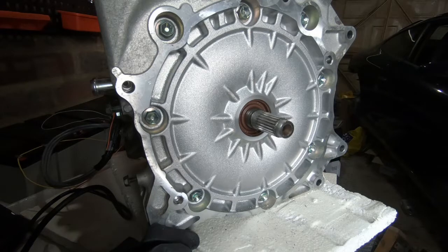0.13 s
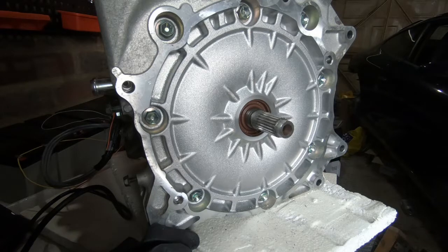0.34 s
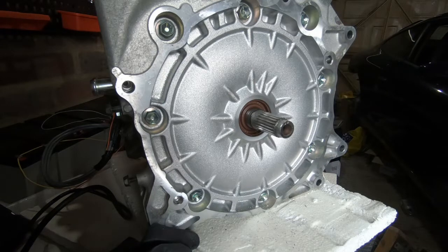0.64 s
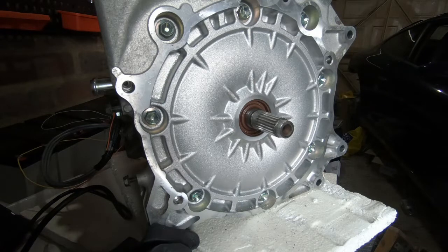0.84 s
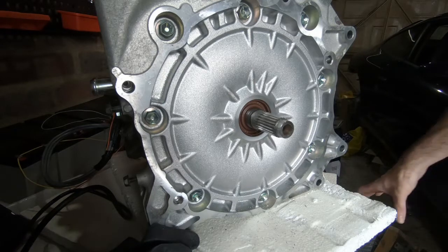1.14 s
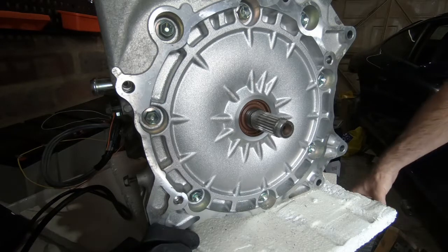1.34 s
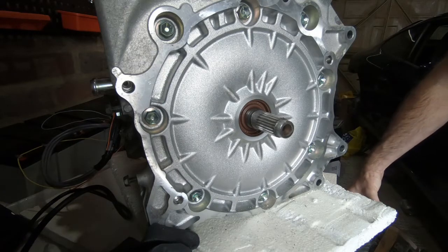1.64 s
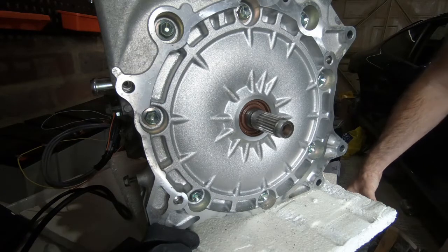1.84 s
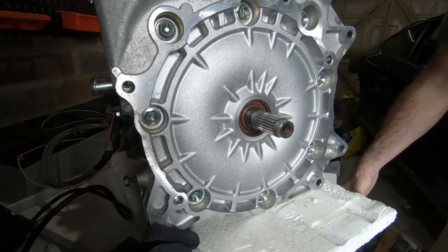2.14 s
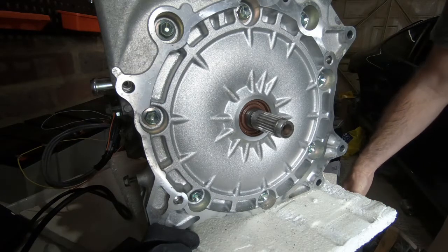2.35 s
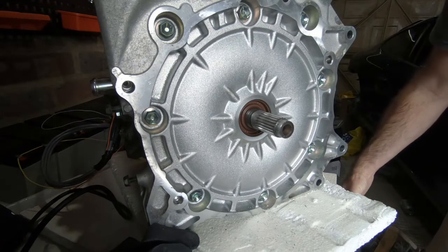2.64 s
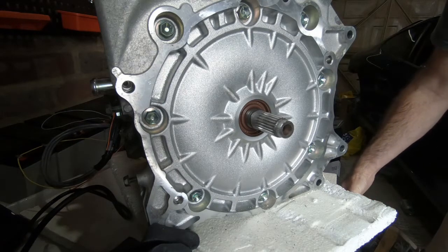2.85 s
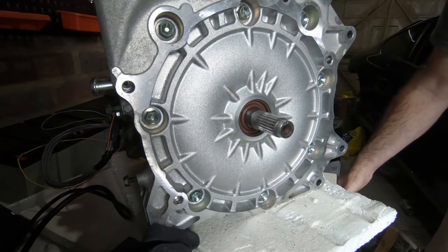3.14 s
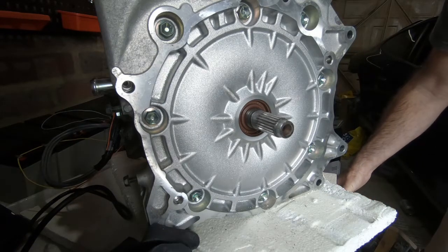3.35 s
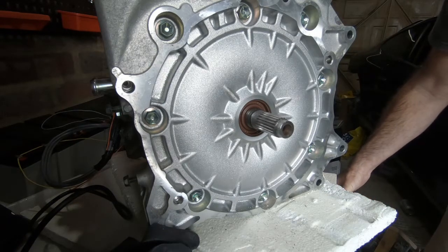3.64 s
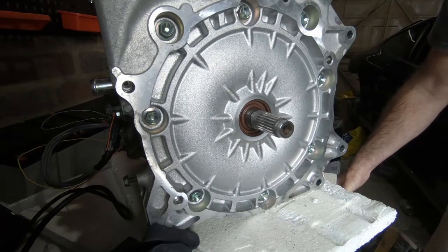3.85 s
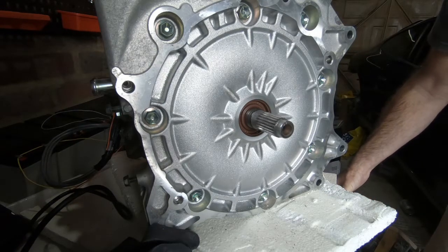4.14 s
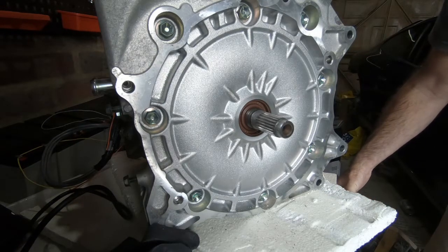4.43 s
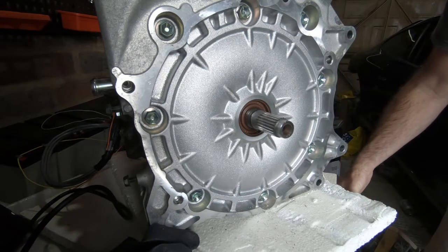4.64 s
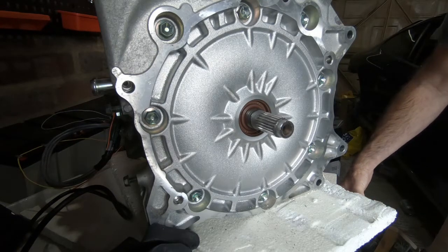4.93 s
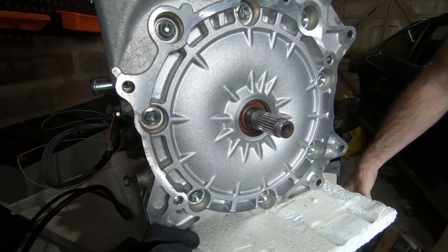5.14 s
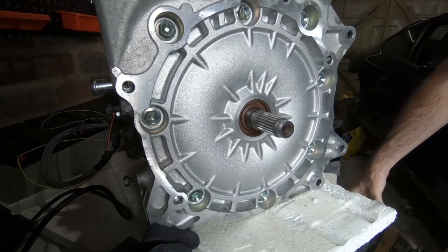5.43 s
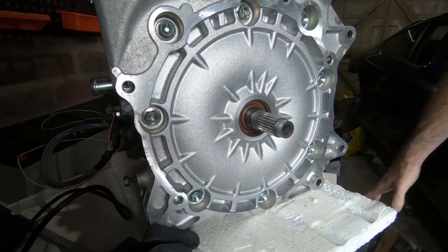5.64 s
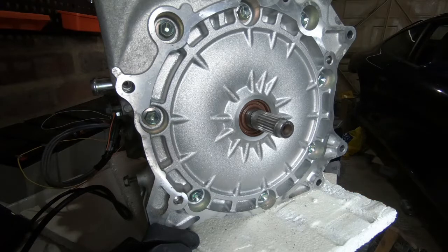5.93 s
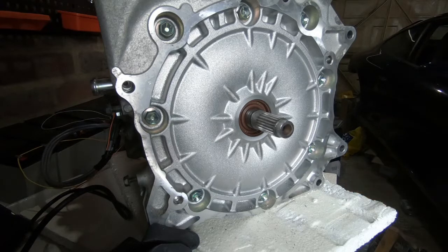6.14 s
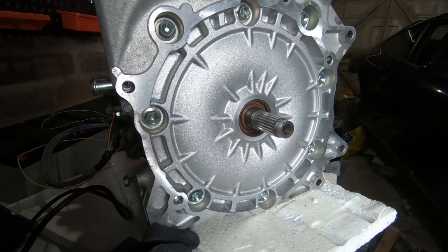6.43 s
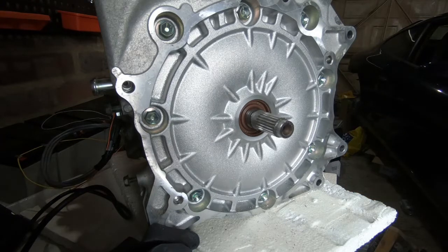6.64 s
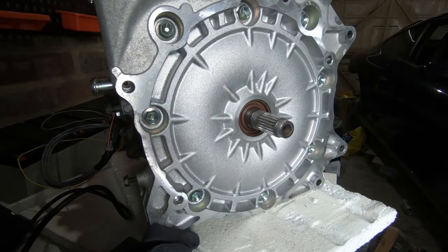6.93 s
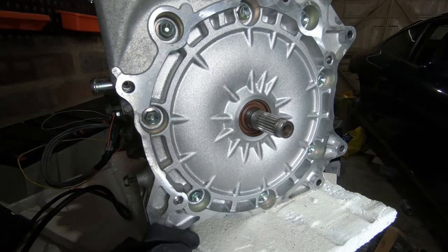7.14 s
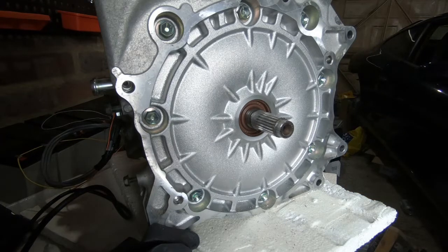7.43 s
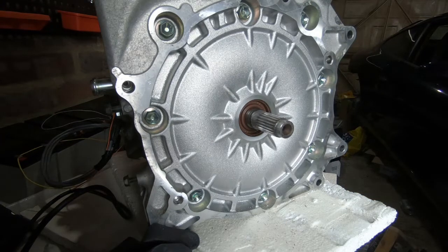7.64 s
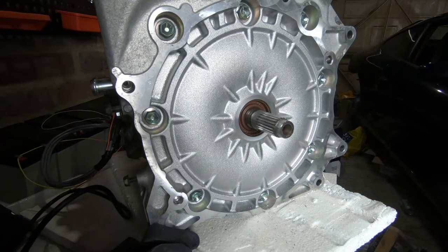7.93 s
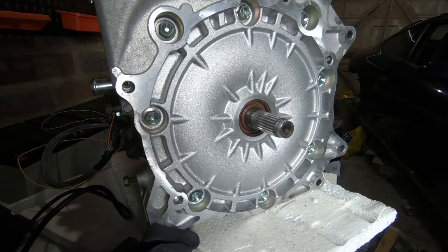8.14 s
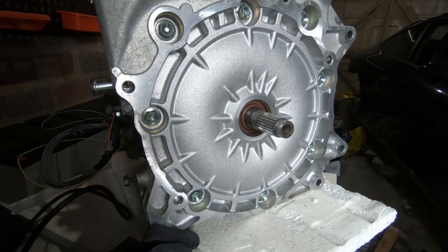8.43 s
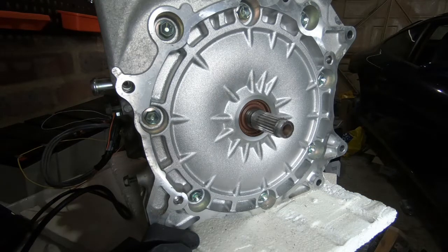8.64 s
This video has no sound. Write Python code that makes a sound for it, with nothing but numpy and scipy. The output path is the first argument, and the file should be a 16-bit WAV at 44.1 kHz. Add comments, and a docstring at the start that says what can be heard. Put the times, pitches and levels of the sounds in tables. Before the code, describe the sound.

An electric motor hums loudly on a bench, drops to a heavier shudder, then picks up speed, with light ticks nearby.

```python
"""A garage, where a large electric motor idles, slows and speeds up on a bench. Its unbalance shakes the
bench, and the throb reaches a camera through it, mostly on the right microphone port; when the bench
resonates, the gain control ducks and the peaks clip. A pump buzzes, low tones waver and the motor's drive
whines as it switches. Traffic washes by outside, a distant engine comes and goes, and small things tick
and rustle nearby."""
import sys
import numpy as np
from scipy import signal
from scipy.fft import rfft, irfft
from scipy.io import wavfile
from scipy.ndimage import uniform_filter1d

SR = 44100
rng = np.random.default_rng(int(sys.argv[2]) if len(sys.argv) > 2 else 0)


def unload_audio(sound):
    """Save the sound as a 16-bit wav file, at the path given as the first command line argument."""
    columns = np.transpose(np.atleast_2d(sound))
    # keep every value between -1 and 1, then stretch to whole-number steps
    steps = np.round(np.clip(columns, -1, 1) * 32767)
    wavfile.write(sys.argv[1], SR, steps.astype(np.int16))


N = 387638


def undb(db):
    """Decibels to gain."""
    return 10 ** (np.asarray(db) / 20)


def curves(table):
    """Breakpoints (time_s, values...) drawn out to one curve per value column."""
    times, *columns = np.transpose(table)
    return [np.interp(np.arange(N) / SR, times, c) for c in columns]


def band(x, hz, *widths_hz):
    """Resonances in series, one per width, with gain 1 at the centre."""
    for width in widths_hz:
        x = signal.lfilter(*signal.iirpeak(hz, hz / width, fs=SR), x)
    return x


def unit(x):
    """Scale to rms 1."""
    return x / np.sqrt(np.mean(x ** 2))


def drift(rate_hz):
    """Smooth random modulation with a spread near 1."""
    hold = int(SR / rate_hz)
    steps = np.repeat(rng.standard_normal(N // hold + 1), hold)
    ramps = uniform_filter1d(steps, hold, mode="wrap")
    return 1.4 * uniform_filter1d(ramps, hold, mode="wrap")[:N]


def stereo_noise(correlation):
    """White noise, from wide (0) to mono (1)."""
    shared, own = rng.standard_normal(N), rng.standard_normal((2, N))
    return np.sqrt(correlation) * shared + np.sqrt(1 - correlation) * own


def motor():
    """Unbalance shakes the bench at orders (multiples) of the shaft rate, a throb that shifts with speed."""
    # idle, braked, let go, a step up: time_s, shaft_hz
    speed = [(0, 57.8), (0.4, 57.64), (1.2, 58.35), (2.0, 58.55), (2.6, 58.6), (3.2, 52.68), (3.6, 49.56),
             (4.05, 46.87), (4.5, 44.79), (4.83, 43.45), (4.91, 44.4), (5.01, 48.3), (5.15, 52.7),
             (5.29, 55.7), (5.4, 58.5), (5.6, 60.05), (5.9, 60.45), (6.3, 60.73), (7.55, 60.92),
             (7.75, 63.18), (7.95, 64.34), (8.2, 64.67), (8.79, 65.1)]
    # speeds for the rows of shake_db: shaft_hz
    shake_hz = [43.5, 45, 46, 47.5, 49, 51, 52.7, 54.6, 55.6, 56.6, 57.7, 58.6, 60, 60.9, 63.6, 64.5, 65.1]
    # shaking at the right port: first_order_db, second_order_db
    shake_db = [(-4, 6.5), (-4.5, 7), (-4, 5.3), (-6.5, 5.5), (-6, 6), (-7.5, 6), (-9.5, 5), (-11.5, 3.5),
                (-10.5, 0.5), (-8.5, -4), (-8.5, -7.5), (-10, -7.5), (-11, -7), (-9.8, -4.4), (-10, -0.9),
                (-9, -3), (-9.5, -4)]
    # how the bench passes the 2nd order: shaft_hz, phase_rad, left_minus_right_db, left_lead_rad
    bench = [(44, -4.1, -23, -2.5), (46, -3.7, -28.5, -2.1), (47.3, -3.15, -26, -1.4),
             (50, -2.85, -22.5, -1.15), (53, -2.7, -21.5, -1.0), (54.6, -3.0, -17, -.7),
             (56.5, -2.9, -11, -.8), (58.4, -2.05, -9.5, -1.7), (59.6, -1.8, -10.7, -1.9),
             (60.5, -1.5, -13.5, -2.15), (61, -1.5, -15.7, -2.2), (63.2, -1.2, -21.5, -1.95),
             (65, -.9, -26.4, -1.9)]
    # weaker orders, relative to the right 1st order: multiple, left_db, right_db
    weak_orders = [(3, -44.5, -30), (4, -43.5, -33), (5, -52, -41), (0.43, -37, -29)]
    bench_lag_s, pull_db_per_hz_per_s = 0.022, 0.01
    hz, = curves(speed)
    lagged_hz = np.interp(np.arange(N) - bench_lag_s * SR, np.arange(N), hz)
    first_db, second_db = (np.interp(lagged_hz, shake_hz, c) for c in np.transpose(shake_db))
    speeding_up = np.maximum(hz - lagged_hz, 0) / bench_lag_s
    first_db += pull_db_per_hz_per_s * speeding_up
    bench_hz, *response = np.transpose(bench)
    bench_rad, left_offset_db, left_lead = (np.interp(hz, bench_hz, c) for c in response)
    angle = -1.51 + 2 * np.pi * np.cumsum(hz) / SR
    second_phase = 2 * angle + bench_rad
    right = undb(first_db + 0.055 * drift(15)) * np.cos(angle)
    right += undb(second_db + .2 * drift(9)) * np.cos(second_phase)
    left = undb(first_db - 15.5) * np.cos(angle - 1.65)
    left += undb(second_db + left_offset_db) * np.cos(second_phase + left_lead)
    out = np.array([left, right])
    for multiple, *port_db in weak_orders:
        out += undb(first_db + np.c_[port_db] + 3 * drift(4)) * np.cos(multiple * angle - .6)
    # a three-halves order fades below and above idling speed
    fade_db = 1.7 * np.minimum(hz - 58.5, 0) - np.maximum(hz - 61, 0)
    out += undb(np.c_[[-48, -26]] + fade_db + 2.1 * drift(2.4)) * np.cos(1.5 * angle)
    return out + panel_ring(second_phase)


def pump():
    """A pump at constant speed buzzes in a phase-locked stack of harmonics."""
    # buzz partials: multiple, left_db, right_db, left_rad, right_rad
    harmonics = [(24, -63, -63, -2.5, 3.0), (25, -50.5, -60, .9, -.3), (26, -53.5, -47.5, 0, -.9),
                 (27, -47, -50, 0, -1.8), (28, -65, -68, 2.0, 2.0), (30, -69, -68, .2, -2.6),
                 (31, -68, -74, 1.5, -.2)]
    pump_hz, out = 49.545, 0
    angle = 2 * np.pi * pump_hz * np.arange(N) / SR + 0.0095 * drift(2.4)
    for multiple, *ports in harmonics:
        db, rad = np.reshape(ports, (2, 2, 1))
        out += undb(db + 0.67 * drift(4)) * np.cos(multiple * angle + rad)
    return out


def hums():
    """Low tones, each wavering on its own in level and phase."""
    # hum tones: pitch_hz, left_db, right_db
    tones = [(98.1, -42.5, -39), (200.7, -53.5, -45.5), (314.8, -57, -51.5), (412, -69, -61)]
    t, out = np.arange(N) / SR, 0
    for hz, *port_db in tones:
        out += undb(np.c_[port_db] + 3.5 * drift(3)) * np.cos(2 * np.pi * hz * t + 0.52 * drift(3))
    return out


def room_tone():
    """The garage's air: a wide, dark bed of noise."""
    # noise spectrum: frequency_hz, left_db, right_db
    spectrum = [(19.8, -56, -49), (34.4, -49.5, -47.5), (57, -51.5, -56), (96, -54.5, -49), (142, -59, -55),
                (226, -72.5, -63), (409, -80, -74.5), (595, -90.5, -83.5), (890, -92.5, -85),
                (1340, -87, -82.5), (1870, -99, -97), (3260, -105, -101), (4700, -114, -110),
                (6100, -110, -105), (9600, -115, -111), (12600, -124, -119), (13400, -150, -145)]
    hz, *port_db = np.transpose(spectrum)
    log_hz = np.log(np.maximum(np.arange(N // 2 + 1) * SR / N, 1))
    gain = undb([np.interp(log_hz, np.log(hz), db) for db in port_db]) * np.sqrt(SR / 2)
    return irfft(rfft(stereo_noise(0.14)) * gain, N)


def drive_whine():
    """The drive's switching sings a thin tone and a steadier octave, both fluttering finely."""
    # swells of the whine: time_s, level_db
    envelope = [(.45, -76), (.62, -68.5), (1.45, -72), (1.6, -79.5), (2.1, -75.5), (2.25, -68), (2.8, -68),
                (3.3, -70.5), (4.1, -70.5), (4.4, -65.5), (5.0, -71.5), (5.6, -78), (5.85, -72.5),
                (6.5, -75), (7.4, -72), (8.3, -69.5)]
    # partials, relative to the envelope: multiple, left_db, right_db
    partials = [(1, 4.5, 7), (2, -10, -7.5)]
    switching_hz, octave_swell_share = 4394.5, .4
    phase = 2 * np.pi * switching_hz * np.arange(N) / SR
    db, = curves(envelope)
    mean_db, out = np.mean(db), 0
    for multiple, *port_db in partials:
        swell_db = (db - mean_db) * octave_swell_share ** (multiple - 1)
        out += undb(mean_db + swell_db + np.c_[port_db] + 1.7 * drift(40)) * np.cos(multiple * phase)
    return out


def traffic():
    """A mid-range wash, mostly tyres beyond the door, over engine rumble."""
    # swells of a mid-range wash: tyre noise, plus a rough rush where the motor's throb clips hardest:
    # time_s, wash_db, body_db
    swells = [(.4, -60, -51.5), (1.15, -50.5, -47), (1.6, -59, -47), (2.25, -57, -46), (2.7, -59.5, -54.5),
              (3.4, -59, -50.5), (4.15, -54.5, -48.5), (4.45, -44.5, -47), (4.7, -52, -44.5),
              (5.3, -56, -47), (5.9, -63, -47.5), (6.4, -66.5, -54), (6.7, -63, -55.5), (6.85, -61.5, -51),
              (7.2, -65.5, -58.5), (7.6, -72.5, -63), (8.6, -74, -67.5)]
    wash_db, body_db = curves(swells)
    pan_db, noise = np.c_[[-3, 2]], stereo_noise(0.44)
    wash = unit(band(band(noise, 1600, 870, 1700), 1700, 3000))
    hiss = unit(band(band(noise, 6300, 2500), 6500, 3000))
    body = undb(body_db + pan_db + drift(8.6)) * unit(band(stereo_noise(0.15), 1000, 800, 700, 1300))
    rumble = undb(-39.5 + 3.7 * drift(3.2)) * unit(band(band(stereo_noise(1), 45, 36), 48, 52))
    return undb(wash_db + pan_db + drift(5.4)) * (wash + undb(-18) * hiss) + body + rumble


def distant_engine():
    """A far engine holds one soft low note, then sags and fades."""
    # the engine's note: time_s, pitch_hz, level_db
    note = [(.1, 136.5, -48), (.4, 139.2, -36), (1.3, 139.6, -37), (1.8, 136.2, -49.5), (2.5, 134, -40),
            (3.2, 132, -70.5)]
    hz, db = curves(note)
    return undb(db + 4.6 * drift(2.1)) * np.cos(2 * np.pi * np.cumsum(hz) / SR)


def ticks():
    """Small things tick: a sharp click and a short rustle ring the same modes, to the right."""
    # tick cues: start_s, click_db, low_modes_db, rustle_db
    cues = [(.567, -32, -3, -55.5), (0.75, -46, 2.5, -70), (.982, -39.5, 1.5, -58),
            (1.783, -30.5, 6.5, -57.5), (2.2102, -26, 3.5, -51.5), (2.449, -45.5, 6, -67),
            (3.837, -35, -13, -61), (4.139, -33.5, -6, -65), (4.447, -28, 7.5, -63.5),
            (6.740, -23, -10, -46), (6.799, -43, -4, -58.5), (7.179, -45, -7, -60.5), (7.199, -45, -1, -58),
            (7.271, -36, -8.5, -53), (7.396, -29, -7.5, -52.5), (7.4934, -5.5, -9, -32),
            (7.5002, -7, -9.5, -31.5), (7.559, -25.5, -8, -43), (7.946, -44.5, 1.5, -61)]
    # resonances of every tick: pitch_hz, width_hz, gain_db
    modes = [(383, 170, 22), (726, 390, 18.5), (1360, 320, 16.5), (2200, 500, 9.5), (3370, 910, 6.5),
             (6600, 1400, 6), (7440, 1600, 5), (10100, 1400, 9), (13500, 3000, -7)]
    attack_s, rustle_t60_s, left_lag_samples = 0.0036, .2, 3
    pan = undb(np.c_[[-3.75, 3.75]])
    out, t = np.zeros((2, N + SR)), np.arange(SR // 2) / SR
    for start_s, click_db, low_db, rustle_db in cues:
        top_db = -19.5 - 0.9 * low_db  # the more body a tick has, the less top
        noise = rng.standard_normal((3, len(t)))
        click = undb(click_db) * (np.arange(len(t)) == np.c_[[left_lag_samples, 0]])
        envelope = undb(rustle_db - 60 * t / rustle_t60_s) * np.minimum(t / attack_s, 1)
        rustle = envelope * (noise[:2] + 0.4 * noise[2])
        start = int(start_s * SR)
        for hz, width, db in modes:
            is_low = hz < 5000
            push = click + rustle * (np.exp(-t / 0.23) if is_low else 1)
            tilt_db = low_db if is_low else top_db if hz > 9000 else 0
            ring = band(push, hz, width, 2 * width, 2 * width)
            out[:, start:start + len(t)] += pan * undb(db + tilt_db) * ring
    return out[:, :N]


def panel_ring(second_phase):
    """A panel rings with the shaft's 6th order, and some 4th, while the motor runs slow."""
    # swell of the ring: time_s, level_db
    envelope = [(2.85, -58), (3.0, -38), (3.8, -29), (4.2, -23.5), (4.5, -8.5), (4.78, -11), (4.87, -24.5),
                (5.15, -34.5), (5.29, -57.5)]
    db, = curves(envelope)
    ring = np.cos(3 * second_phase - 2.7) + undb(-3.5) * np.cos(2 * second_phase - .8)
    return undb(db) * ring * np.c_[[-undb(-15), 1]]  # left is weaker, in opposite polarity


def gain_control(x):
    """The louder port sets one gain for both: it ducks fast and recovers slowly."""
    threshold_db, cut_db_per_db, duck_s, recover_s = -8.5, .6, 0.16, 0.54
    hop = 441  # samples
    power = uniform_filter1d(x ** 2, size=8 * hop, axis=1).max(axis=0)[::hop]
    targets_db = -cut_db_per_db * np.maximum(10 * np.log10(power + 1e-12) - threshold_db, 0)
    gain_db = [targets_db[0]]
    for target in targets_db[1:]:
        gap = target - gain_db[-1]
        gain_db.append(gain_db[-1] + gap * hop / SR / (duck_s if gap < 0 else recover_s))
    return x * undb(np.interp(np.arange(N), np.arange(len(gain_db)) * hop, gain_db))


def scene():
    """The stereo mix: the motor up front, over a steady bed, the street and the ticks."""
    throb = motor()
    bed = undb(1.5) * (pump() + hums() + room_tone())
    return throb + bed + drive_whine() + traffic() + distant_engine() + ticks()


def record(dry):
    """The camera ducks the mix, clips its peaks hard at full scale and cuts the top."""
    clipped = np.clip(gain_control(dry), -1, 1)
    cutoff_hz = 15500
    return signal.sosfilt(signal.ellip(8, .05, 70, cutoff_hz, fs=SR, output="sos"), clipped)


dry = scene()
out = record(dry)
unload_audio(out)
```